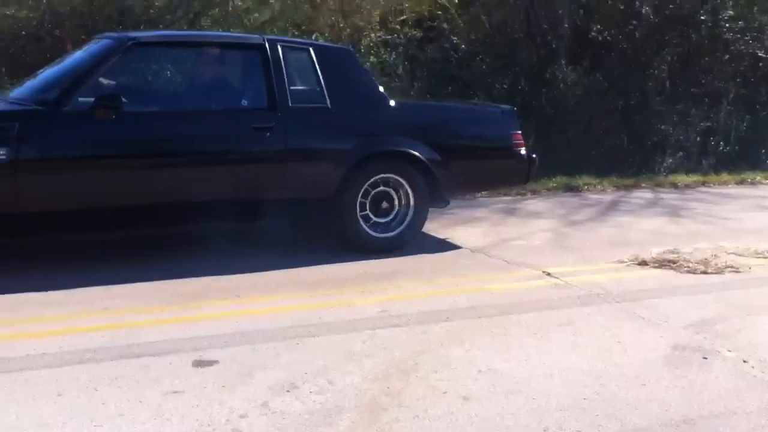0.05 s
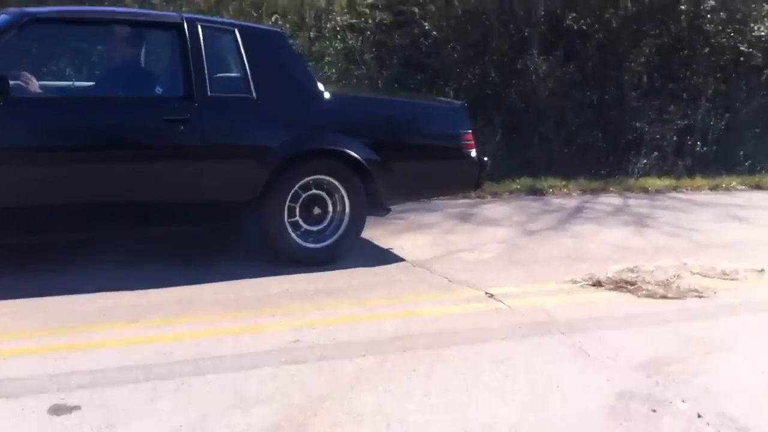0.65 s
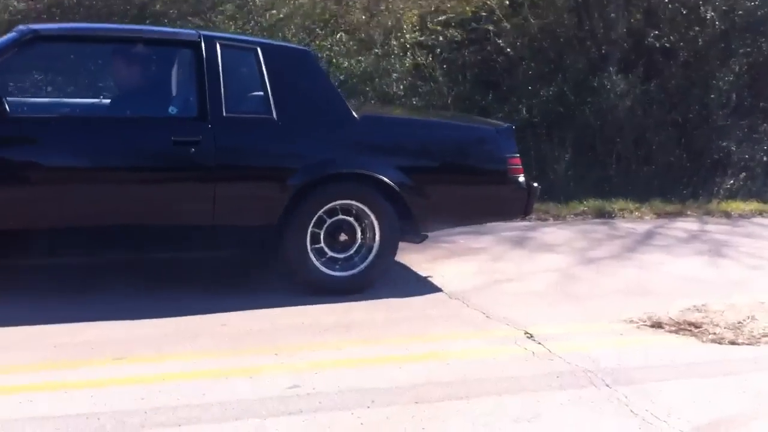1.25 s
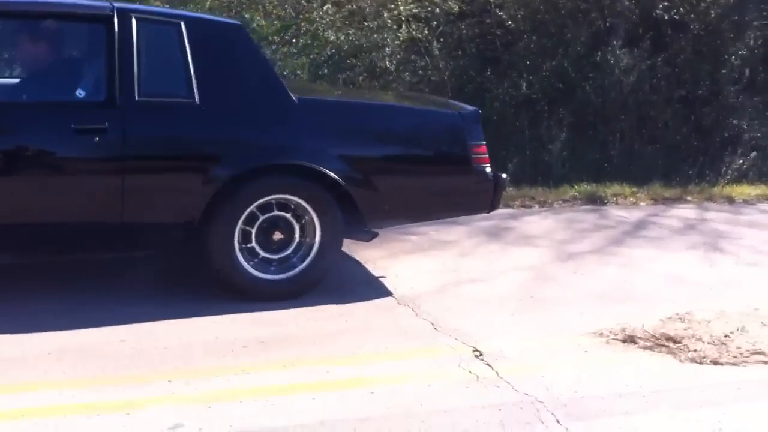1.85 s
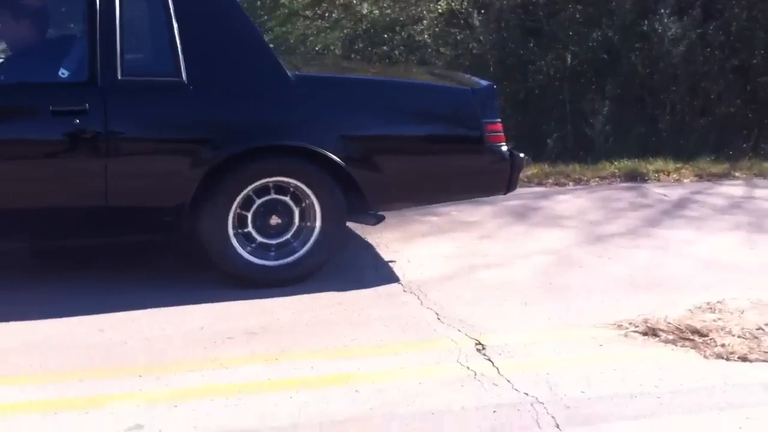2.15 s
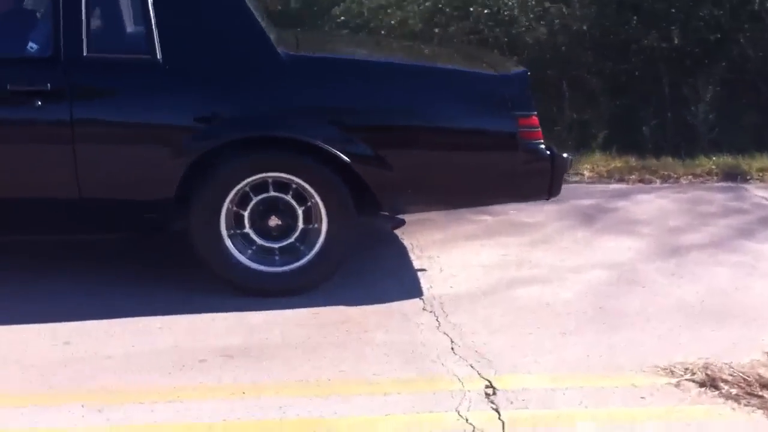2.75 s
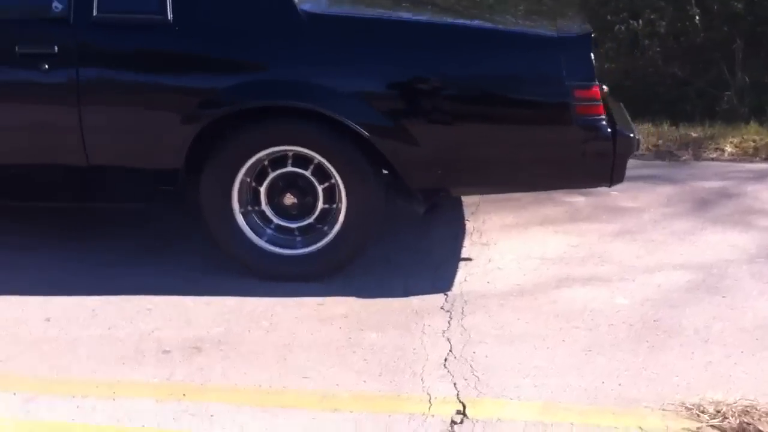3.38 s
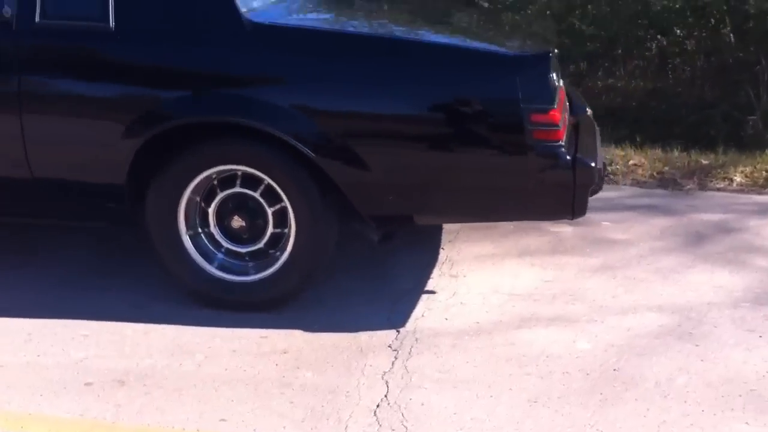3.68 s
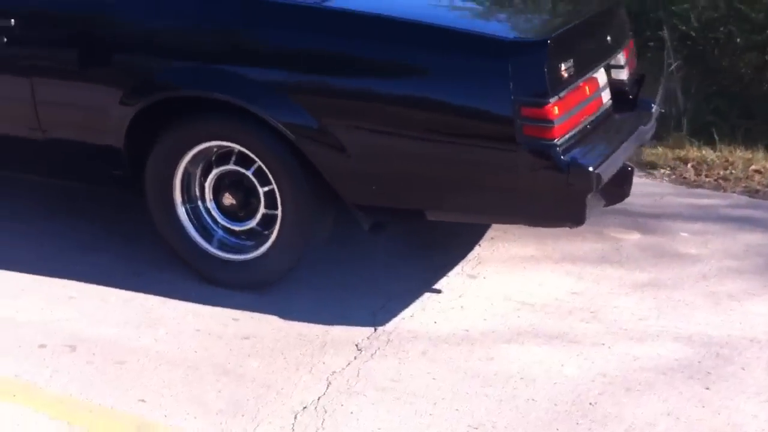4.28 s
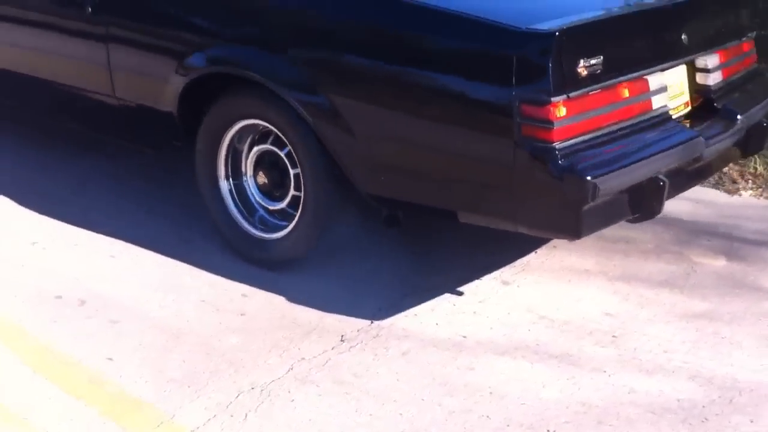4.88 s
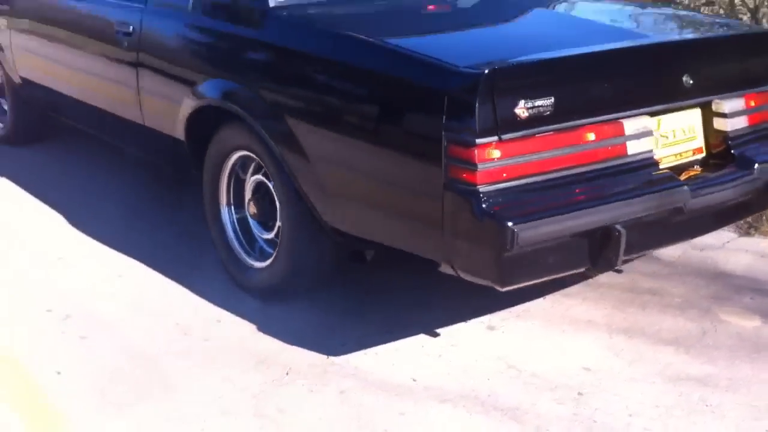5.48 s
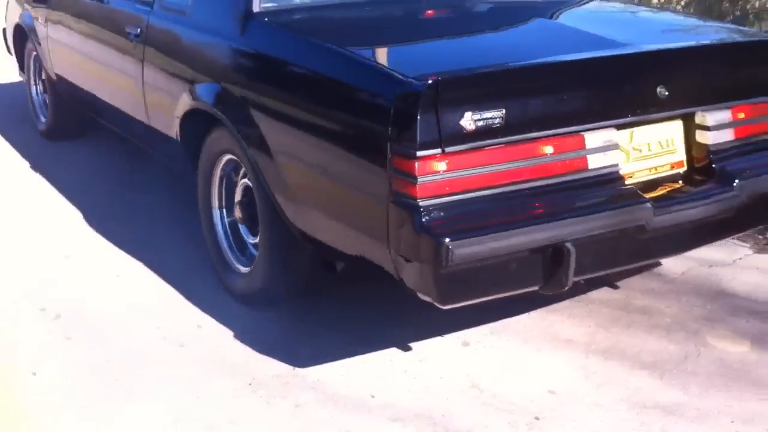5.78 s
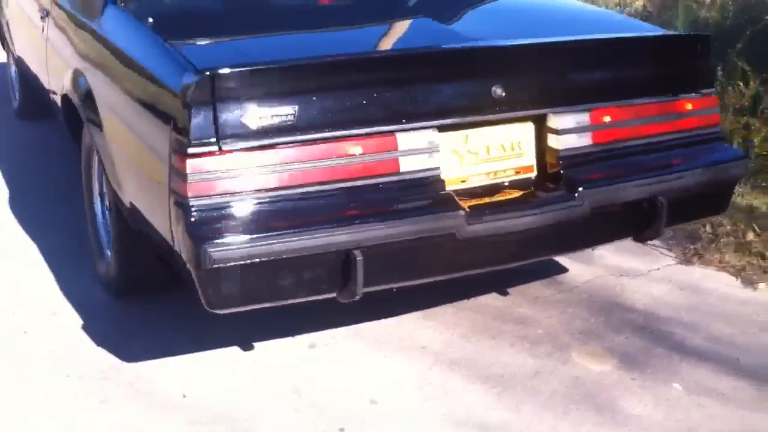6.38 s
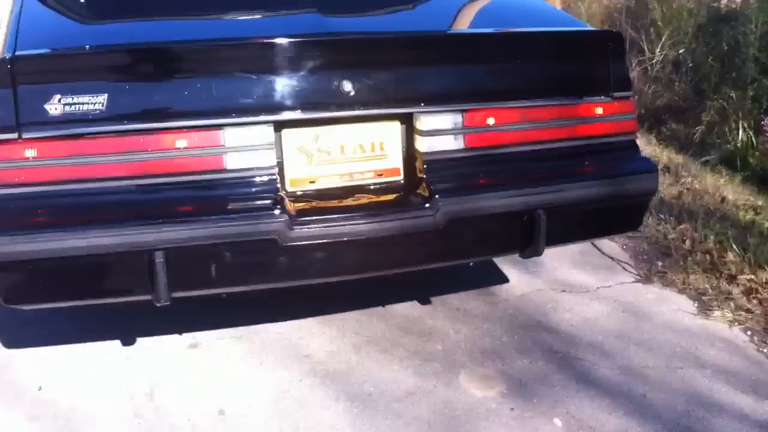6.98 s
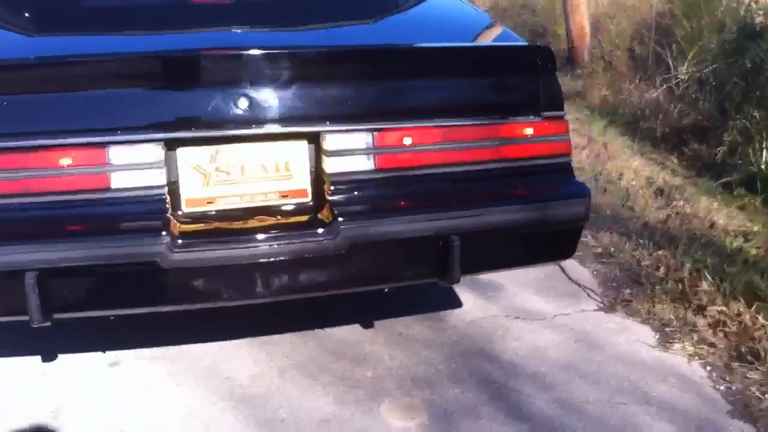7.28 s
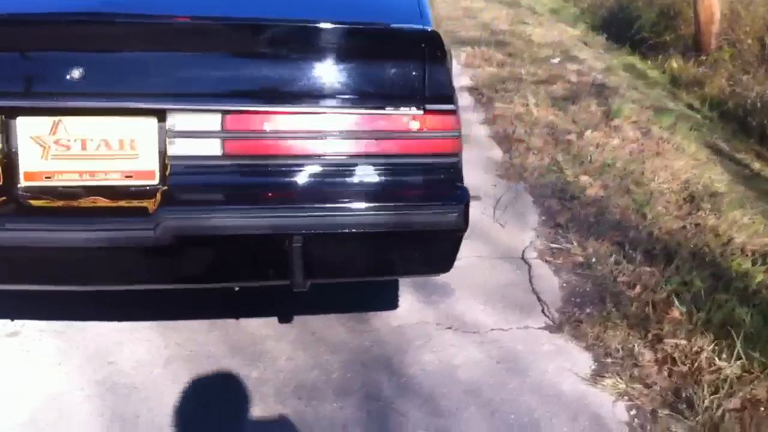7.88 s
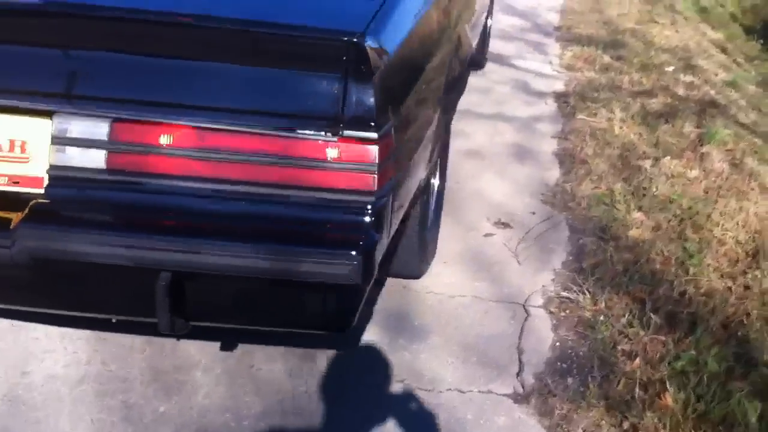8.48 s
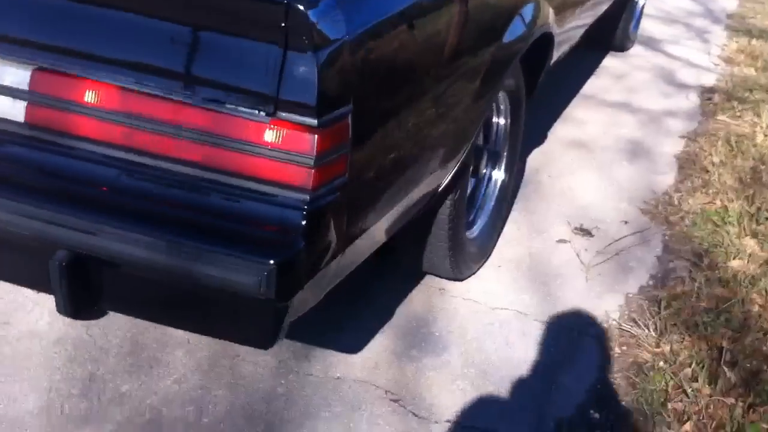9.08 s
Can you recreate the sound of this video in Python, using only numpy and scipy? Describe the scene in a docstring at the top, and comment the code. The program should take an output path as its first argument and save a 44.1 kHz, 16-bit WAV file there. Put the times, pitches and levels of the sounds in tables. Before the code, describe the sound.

A car engine idles with a deep, uneven exhaust throb, surging about every two seconds and growing louder near the tailpipes.

```python
"""On a country road a turbocharged V6 idles, surging about every two seconds, while the microphone is
carried along its side and round behind the two tailpipes. Uneven firings ring the exhaust pipes, puff
out gas and shake a loose heat shield. The drive belt swishes, the engine bay and air intake hiss, and
the fuel pump whines. A breeze rumbles on the microphone; shoes scuff and tick on grit."""
import sys
import numpy as np
from scipy import signal
from scipy.fft import rfft, irfft, next_fast_len
from scipy.io import wavfile
from scipy.ndimage import uniform_filter1d, minimum_filter1d

SR = 44100
rng = np.random.default_rng(int(sys.argv[2]) if len(sys.argv) > 2 else 0)


def digitize_waveform(pressure):
    """Quantize a signal to 16-bit integers and store it at the path in sys.argv[1].

    Rows of a 2-D input are taken as channels; values are limited to [-1, 1].
    """
    field = np.atleast_2d(pressure).T
    bounded = np.clip(field, -1, 1)
    quanta = np.round(bounded * 32767).astype(np.int16)
    wavfile.write(sys.argv[1], SR, quanta)


N = 407484
TIME = np.arange(N) / SR


def undb(db):
    """Turn decibels into a number to multiply by."""
    return 10 ** (np.asarray(db) / 20)


def curves(table):
    """Join a table's timed points with straight lines, one curve per value column."""
    times, *columns = np.transpose(table)
    return [np.interp(TIME, times, column) for column in columns]


def unit(x):
    """Scale a signal so its typical swing is 1."""
    return x / np.std(x)


def even(x):
    """Even out slow changes in loudness but keep the quick beat."""
    power = uniform_filter1d(uniform_filter1d(x ** 2, size=9800), size=4900)
    return x / np.sqrt(power + 1e-18)


def wander(rate_hz):
    """A smooth random wobble, about 1 in size."""
    hold = int(SR / rate_hz)
    steps = np.repeat(rng.standard_normal(N // hold + 1), hold)
    return 1.3 * uniform_filter1d(steps, hold)[:N]


def ring(x, notes, low_hz, high_hz):
    """Ring notes given as (pitch Hz, width Hz, dB), keeping the band from low_hz to high_hz."""
    ringing = sum(undb(db) * signal.lfilter(*signal.iirpeak(hz, hz / width, fs=SR), x)
                  for hz, width, db in notes)
    return signal.sosfilt(signal.butter(4, [low_hz, high_hz], "band", fs=SR, output="sos"), ringing)


def noise(colour):
    """Noise whose tone follows a list of (Hz, dB) points."""
    hz, db = np.transpose(colour)
    size = next_fast_len(N)
    freqs = np.maximum(np.fft.rfftfreq(size, 1 / SR), 1)
    shape = undb(np.interp(np.log(freqs), np.log(hz), db))
    return unit(irfft(rfft(rng.standard_normal(size)) * shape, size)[:N])


def fade(pulses, decay_s):
    """Jump up at each pulse, then die away."""
    return signal.lfilter([1], [1, -np.exp(-1 / (decay_s * SR))], pulses)


def taps(rows, decay_s):
    """One fading jump for each (seconds, dB) row."""
    hits = np.zeros(N)
    for start, db in rows:
        hits[int(start * SR)] = undb(db)
    return fade(hits, decay_s)


# Engine surges. Each row: start in seconds, length in seconds, rise in firing rate in Hz
# (short surges stop before reaching it), sag beforehand in Hz.
SURGES = [(.812, .542, 7.236, -.282), (2.222, .869, 2.879, 2.48), (4.328, .539, 5.562, 2.193),
          (6.449, .522, 6.671, 2.264), (8.229, 1.4, 2.925, 2.361)]
IDLE_FIRING_HZ = 55.135
def governor(sag_s=1.553, rise_s=.319, fall_s=.307):
    """The idle sinks until the speed control catches it. Gives firing rate and its surge part in Hz."""
    surge = sag = 0
    for start, length, rise_hz, sag_hz in SURGES:
        age = TIME - start
        surge += rise_hz * np.clip(np.minimum(age / rise_s, (length - age) / fall_s), 0, 1)
        sag += sag_hz * np.interp(age, [-sag_s, 0, rise_s], [0, 1, 0])
    return IDLE_FIRING_HZ - sag + surge, surge


# The six cylinders in firing order. Each entry: strength in dB.
CYLINDER_DB = [6, 0.5, 6, -19, 7.5, 5]
# One bank (row of cylinders) feeds its pipe on every other firing. Each entry: strength in dB.
ONE_BANK_DB = [-2, -20]
BANK_LEAD = 0.2777  # the second bank is early by this share of the gap between firings
def fire(firings, scatter_db, jitter, cylinders=CYLINDER_DB):
    """One pulse per firing; the cylinders differ, and no two burns are alike."""
    number = np.arange(int(firings[-1]))
    timing_luck, size_luck = rng.standard_normal((len(number), 2)).T
    due = number - BANK_LEAD * (number % 2) + jitter * timing_luck
    sample = np.interp(due, firings, np.arange(N))
    size = undb(np.asarray(cylinders)[number % len(cylinders)] + scatter_db * size_luck)
    return np.bincount(sample.astype(int), size, N)


# The exhaust's deep notes. Each row: pitch in Hz, width in Hz, relative level in dB.
HUM_NOTES = [(132.5, 8.7, 0), (146.4, 7.6, -7.5)]
def pipe_hum(bank, push):
    """One bank's pipe rings with a deep hum."""
    return even(ring(unit(bank) + .1 * push, HUM_NOTES, low_hz=128, high_hz=160.9))


# Notes of the exhaust's boom and of the gap between the car's floor and the road.
# Each row: pitch in Hz, width in Hz, relative level in dB.
BOOM_NOTES = [(181.3, 10.1, 1), (187.3, 3.6, -35)]
UNDERFLOOR_NOTES = [(183.4, 33.4, 0)]
# The walk round the tail. Each row: time in seconds, how far round from 0 to 1.
BEHIND = [(4.4, 0.19), (5.8, 0.51)]
def pipe_boom(push, gas):
    """Firings boom: rounded by the ringing gap under the car, short thumps straight behind the pipes."""
    direct = even(ring(push + .1 * gas, BOOM_NOTES, low_hz=140, high_hz=235))
    rounded = even(ring(direct, UNDERFLOOR_NOTES, low_hz=60, high_hz=540))
    thumps = even(ring(push, [(186, 38, 0)], low_hz=125, high_hz=248))
    facing = np.interp(TIME, [6.9, 7.05, 8.25, 8.45], [.15, .85, .85, .15])
    from_rear = facing * thumps + (1 - facing) * direct
    behind = curves(BEHIND)[0]
    return even(behind * from_rear + (1 - behind) * rounded)


# The higher pipe notes. Each row: pitch in Hz, width in Hz, relative level in dB.
RASP_NOTES = [(530.3, 18.5, 9), (610, 29, -16), (685, 17.5, -4)]
# Their loudness along the walk. Each row: time in seconds, relative level in dB.
RASP_LEVELS = [(0, -30), (1, -34.5), (1.9, -33), (3.3, -38.5), (3.8, -37), (6.5, -36), (7.35, -40),
               (7.8, -46.5), (8.4, -31.5), (9.24, -41.5)]
def pipe_rasp(push, gas, surge_hz):
    """Swirling gas rings the higher pipe notes, which weaken during a surge."""
    rasp = even(ring(push + 1.44 * gas, RASP_NOTES, low_hz=393, high_hz=850))
    return rasp * undb(curves(RASP_LEVELS)[0] - 4 - .5 * surge_hz)


def pipe_thud(push):
    """The bare pulses leave the pipes as a soft thud, plainest from behind."""
    thud = even(ring(push, [(51, 14, -8), (85, 9, -8), (106.6, 6.9, 8)], low_hz=41, high_hz=123))
    return thud * undb(np.interp(TIME, [1, 2.2, 4, 6.5, 7.5, 9], [-44.5, -45.5, -48, -37.5, -36.5, -39]))


# Notes of the tailpipe's body and its open end's bark.
# Each row: pitch in Hz, width in Hz, relative level in dB.
BODY_NOTES = [(235.3, 30, -13.5), (234.9, 7.3, -6), (267.2, 37, -8.5)]
BARK_NOTES = [(340, 24, -1), (351.8, 13.8, 19), (354, 16, -29)]
# The exhaust along the walk. Each row: time in seconds, then hum, boom, body and bark in relative dB.
EXHAUST_LEVELS = [(0, -22, -20.5, -30, -42), (.7, -22.5, -20.5, -30, -43.5), (1.1, -21.5, -19.5, -27, -41),
                  (1.55, -23, -17, -26.5, -34), (2.25, -28.5, -16, -26.5, -39),
                  (2.8, -22.5, -17, -29, -37.5), (3.65, -15.5, -15.5, -23.5, -33),
                  (4.35, -18, -16.5, -20.5, -36.5), (4.9, -19, -19, -19, -33), (5.7, -20, -26, -19, -26.5),
                  (6.08, -17, -23, -22.5, -25), (6.4, -17.5, -16, -25, -26), (6.92, -19, -12, -25, -39.5),
                  (7.04, -11, -12, -21.5, -32), (7.35, -11.5, -12.5, -19, -24),
                  (8.02, -13.5, -14.5, -19, -27.5), (8.45, -18, -16, -32, -36.5),
                  (9.24, -23.5, -24, -22.5, -25)]
# The idle stumbles. Each row: time in seconds, dip of the hum and boom in dB.
STUMBLES = [(.66, 8), (1.29, 4), (1.5, 7), (1.62, 6), (1.73, 3.5), (2.069, 6), (2.244, 10.5), (2.48, 6),
            (6.4, 8), (6.97, 10.5)]
def exhaust(pulses, bank, surge_hz):
    """Firings ring the pipes, and the puff of gas behind each one roughens the sound."""
    push = unit(pulses)
    gas = unit(fade(pulses, decay_s=.016) * rng.standard_normal(N))
    rough_push = push + .35 * gas
    hum_db, boom_db, body_db, bark_db = curves(EXHAUST_LEVELS)
    # a surge pulls the firings into tune with the boom and out of tune with the body and bark
    hum = pipe_hum(bank, push) * undb(hum_db - 2 + .01 * surge_hz)
    boom = pipe_boom(push, gas) * undb(boom_db + .5 + .97 * surge_hz)
    body = even(ring(rough_push, BODY_NOTES, low_hz=198, high_hz=295))
    body *= undb(body_db - 4.5 - .43 * surge_hz)
    bark = even(ring(rough_push, BARK_NOTES, low_hz=285, high_hz=398))
    bark *= undb(bark_db - 1.32 * surge_hz)
    dip_db = sum(db * np.exp(-((TIME - time) / .025) ** 2) for time, db in STUMBLES)
    throb = (hum + boom) * undb(-dip_db) + (body + bark) * undb(-.3 * dip_db)
    return throb + pipe_rasp(push, gas, surge_hz) + pipe_thud(push)


# The shield's two notes. Each row: pitch in Hz, width in Hz, a gain in dB that is evened out again.
SHIELD_NOTES = [(2486, 126, 0), (2660, 94, 6.5)]
# Their loudness along the walk. Each row: time in seconds, then lower and upper note in relative dB.
SHIELD_LEVELS = [(0, -49, -48.5), (1, -63, -40.5), (2.85, -47, -38.5), (3.55, -37.5, -50), (4.8, -54, -38),
                 (5.7, -34.5, -36.5), (6.201, -38.5, -34), (6.5, -34, -38), (6.9, -45, -42),
                 (7.35, -34.5, -50), (7.95, -59, -34.5), (8.7, -41, -41), (9.1, -35, -34.5)]
# The hardest chinks. Each row: start in seconds, relative strength in dB.
CHINKS = [(5.823, 10), (6.167, 8), (6.278, 6), (6.314, 8), (6.549, 7), (6.578, 9), (7.29, 7), (9.043, 10)]
def heat_shield(firings):
    """Firings shake a thin, loose shield into a buzz; its two notes spread in different directions."""
    jolts = unit(fade(fire(firings, scatter_db=3.5, jitter=.12), decay_s=.009))
    shake = 1 + .45 * jolts + 2.8 * taps(CHINKS, decay_s=.0045)
    rattle = shake * rng.standard_normal(N)
    return sum(even(ring(rattle, [note], low_hz=2303, high_hz=2814)) * undb(db - 3)
               for note, db in zip(SHIELD_NOTES, curves(SHIELD_LEVELS)))


# Echoes off the road and the car's underside. Each row: delay in seconds, share of the direct sound.
ECHOES = [(.0013, 0.17), (.0029, 0.21), (.0052, 0.27)]
def bounce(x, drift=.0576):
    """Short echoes colour the sound; their paths shift as the microphone moves."""
    echoes = sum(gain * np.interp(TIME - delay * (1 + drift * wander(1.5)), TIME, x)
                 for delay, gain in ECHOES)
    return unit(x + echoes)


# One lap of the belt. Each row: share of the lap from 0 to 1, relative level in dB.
BELT_LAP = [(0, -7), (.15, -8), (.33, 0.5), (.5, -7.5), (.7, 1.5), (.87, -4.5)]
# The belt's tone. Each row: frequency in Hz, relative level in dB.
BELT_COLOUR = [(3500, -3), (4600, 6), (5500, 11.5), (6200, 13), (6900, 1.5), (8000, -29), (10500, -26),
               (12700, -24), (16000, -28)]
# The car's front along the walk. Each row: time in seconds, then belt, bay and intake in relative dB.
FRONT_LEVELS = [(0, -41, -47.5, -42.5), (2.3, -41, -46, -41), (3.5, -37, -44.5, -39.5),
                (5.6, -44.5, -43, -44), (6.6, -47, -45, -44), (7.7, -50, -47.5, -46.5),
                (9.24, -49, -45, -45)]
def drive_belt(firings, laps_per_cycle=.6375):
    """Worn-smooth stretches of the belt swish over the pulleys on every lap."""
    lap = firings / len(CYLINDER_DB) * laps_per_cycle % 1
    swish = undb(np.interp(lap, *np.transpose(BELT_LAP), period=1) + 1.7 * wander(49))
    return bounce(bounce(swish * noise(BELT_COLOUR))) * undb(curves(FRONT_LEVELS)[0])


# The engine bay's tone. Each row: frequency in Hz, relative level in dB.
BAY_COLOUR = [(300, 2), (450, 11), (700, 9.5), (860, 3), (1050, 6), (1300, 2.5), (1440, 2), (1560, 0.5),
              (1850, 1), (2100, 2.5), (3100, -1), (3900, -7), (5000, -38), (8000, -14.5)]
def engine_bay():
    """The fan and valves make a rushing sound that comes out from under the car."""
    return bounce(noise(BAY_COLOUR), drift=.083) * undb(curves(FRONT_LEVELS)[1] + 7 + wander(25))


# The intake's tone from beside and behind the car. Each row: frequency in Hz, relative level in dB.
INTAKE_BESIDE = [(2500, 2), (4000, 9), (5500, -5), (6800, 5.5), (7800, 8), (9300, 11), (10400, 7),
                 (12600, 12.5), (14500, 8), (16000, -70)]
INTAKE_BEHIND = [(2500, -10), (4000, 15.5), (5500, 14.5), (6900, 24.5), (7800, 14.5), (9000, 9.5),
                 (10600, -46.5), (12500, -5), (14500, -18), (16000, -69)]
def air_intake(firings):
    """Air hisses into the engine; the treble spits with each firing and swells once a crankshaft turn."""
    behind = curves(BEHIND)[0]
    side = np.sqrt(1 - behind) * noise(INTAKE_BESIDE) * undb(-1)
    rear = np.sqrt(behind) * noise(INTAKE_BEHIND) * undb(4)
    hiss = bounce(side + rear)
    low = signal.sosfiltfilt(signal.butter(2, 7500, fs=SR, output="sos"), hiss)
    spit_db = 6 * (.5 - firings % 1)
    turn_db = 1.3 * np.cos(2 * np.pi * firings / (len(CYLINDER_DB) / 2))
    treble = (hiss - low) * undb(spit_db + turn_db + 1.2 * wander(45))
    return (low * undb(.4 * spit_db) + treble) * undb(curves(FRONT_LEVELS)[2])


# The breeze's tone. Each row: frequency in Hz, relative level in dB.
BREEZE_COLOUR = [(20, -11), (40, -7), (60, 5), (90, 20), (130, 0), (300, -26)]
def breeze():
    """Light air rumbles on the microphone, with one short gust."""
    gust_db = 15 * np.exp(-((TIME - 7.41) / .024) ** 2)
    return noise(BREEZE_COLOUR) * undb(np.interp(TIME, [2, 5], [-53, -47.5]) + wander(4) + gust_db)


# Soles dragging on concrete. Each row: loudest moment in seconds, level in dB.
SCUFFS = [(.12, -42), (.85, -44), (1.03, -40.5), (1.7, -42), (2.34, -41), (7.0, -44), (8.602, -47),
          (9.02, -43)]
# A scuff's tone. Each row: frequency in Hz, relative level in dB.
SCUFF_COLOUR = [(1500, -8), (4000, 5.5), (8000, -4), (13000, 3), (16000, -5)]
def shoe_scuffs(swell_s=.084):
    """Each dragged step swells and fades as a short, grainy hiss."""
    swell = sum(undb(db) * np.exp(-((TIME - time) / swell_s) ** 2) for time, db in SCUFFS)
    return swell * noise(SCUFF_COLOUR) * undb(1.8 * wander(120))


# Grit underfoot. Each row: start in seconds, level in dB.
GRIT_TICKS = [(1.453, -33), (1.632, -34), (9.175, -36)]
def grit():
    """Small stones tick under the shoes."""
    return taps(GRIT_TICKS, decay_s=.015) * noise([(500, -15), (3000, 0), (14000, -1)])


def sizzle():
    """A thin, flickering high sizzle swells and fades around 3.45 s."""
    passing = np.exp(-((TIME - 3.45) / .5) ** 2)
    hiss = bounce(noise([(11000, -25), (12700, -2), (15500, -22)]))
    return passing * hiss * undb(-44 + 3.1 * wander(40))


# The fuel pump along the walk. Each row: time in seconds, level in dB.
PUMP_LEVELS = [(3, -68), (3.5, -49), (4.3, -67), (4.55, -48.5), (5.3, -43), (5.75, -58), (6.2, -42.5),
               (6.65, -38), (7.1, -47), (8.4, -52.5), (9.24, -48)]
def fuel_pump(pitch_hz=985.1):
    """The pump under the tail whines on one steady note, heard mostly from the rear."""
    waver = 1 + .0006 * wander(9)
    phase = 2 * np.pi * np.cumsum(pitch_hz * waver) / SR
    return np.sqrt(2) * np.sin(phase) * undb(curves(PUMP_LEVELS)[0])


def tailpipe_hiss():
    """Gas leaving the near tailpipe hisses as the microphone rounds the rear corner."""
    passing = np.exp(-((TIME - 5.65) / .5) ** 2)
    return passing * noise([(5800, -25), (6900, -2), (7800, -23)]) * undb(-41)


def scene():
    """One running count of firings drives exhaust, shield, belt and intake; the rest is added on top."""
    firing_hz, surge_hz = governor()
    firings = np.cumsum(firing_hz) / SR
    pulses = fire(firings, scatter_db=1, jitter=.006)
    bank = fire(firings, scatter_db=1.5, jitter=.0087, cylinders=ONE_BANK_DB)
    car = exhaust(pulses, bank, surge_hz) + heat_shield(firings)
    car += drive_belt(firings) + engine_bay() + air_intake(firings)
    car += sizzle() + tailpipe_hiss() + fuel_pump()
    return (car + grit() + shoe_scuffs() + breeze())[None]


def record(dry, top_hz=15650):
    """A limiter turns the strongest throbs down to full scale, and the highest treble is cut."""
    allowed = 1 / np.maximum(np.abs(dry), 1)
    gain = uniform_filter1d(minimum_filter1d(allowed, size=801), size=801)
    return signal.sosfilt(signal.ellip(10, .2, 80, top_hz, fs=SR, output="sos"), dry * gain)


dry = scene()
out = record(dry)
digitize_waveform(out)
```